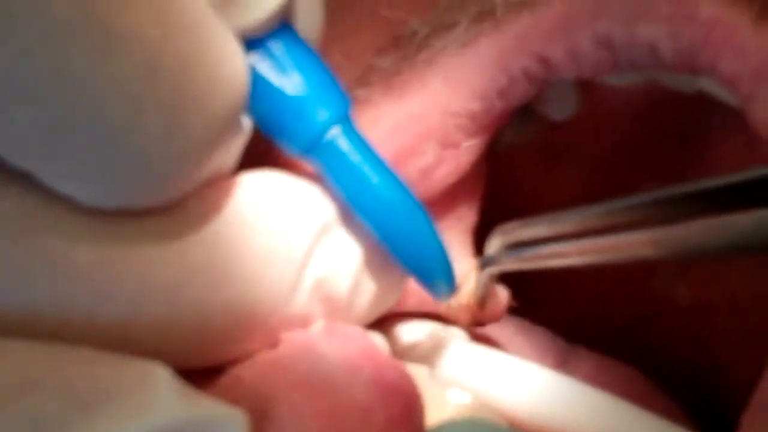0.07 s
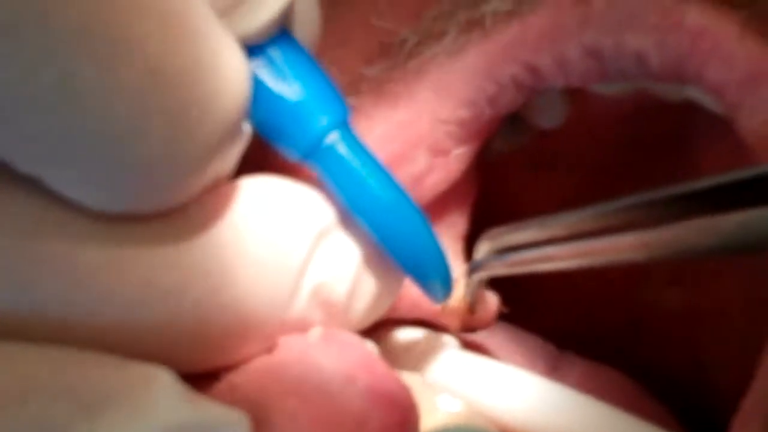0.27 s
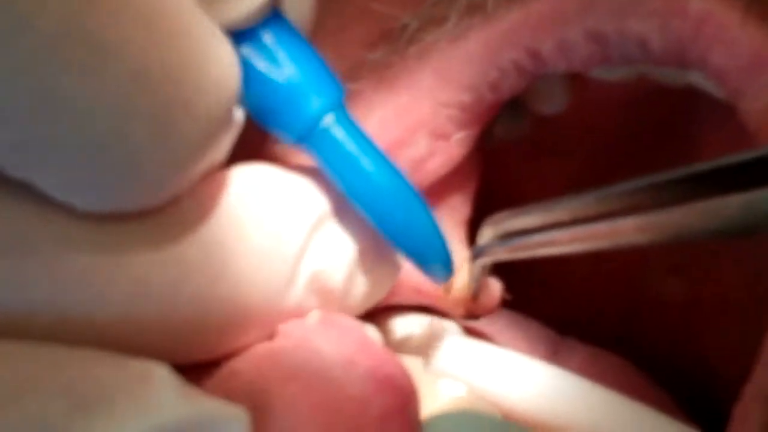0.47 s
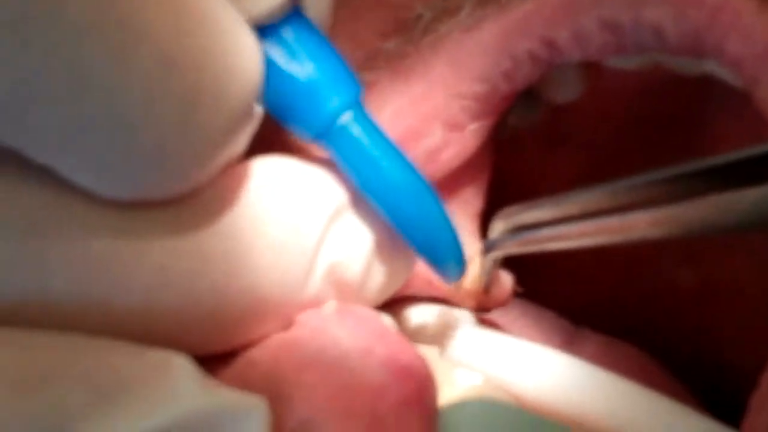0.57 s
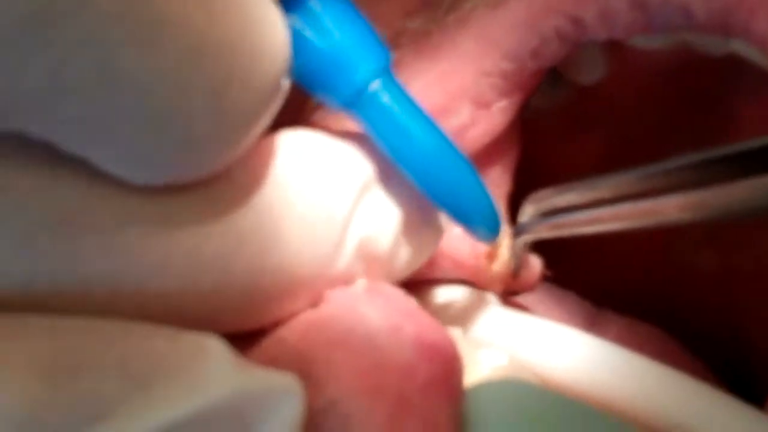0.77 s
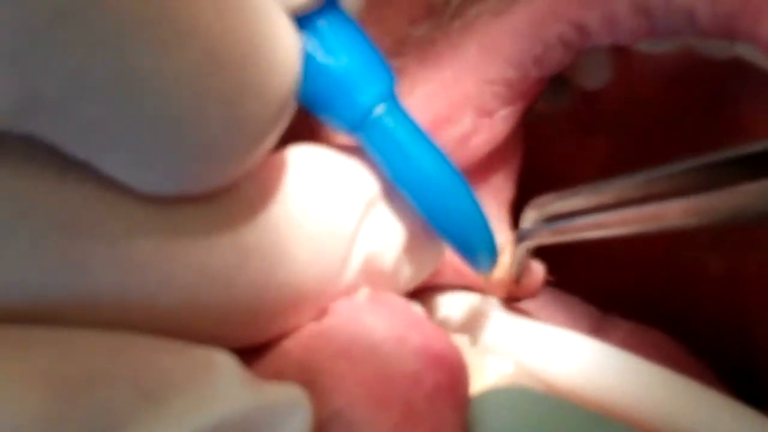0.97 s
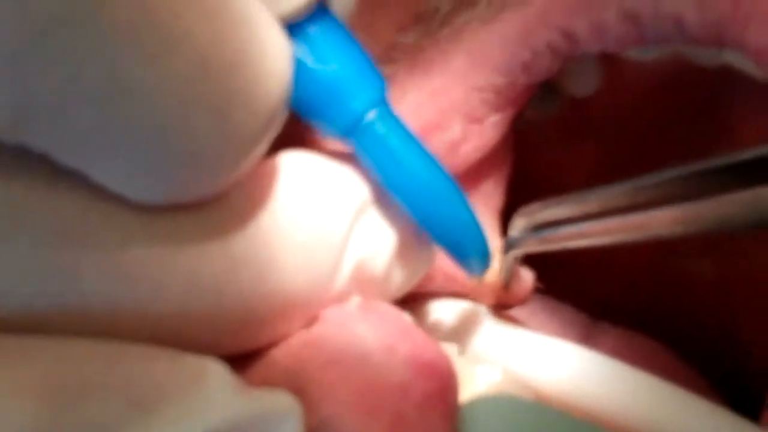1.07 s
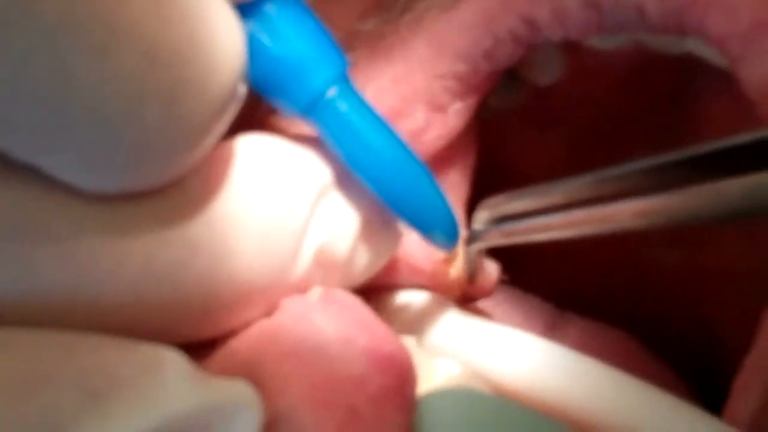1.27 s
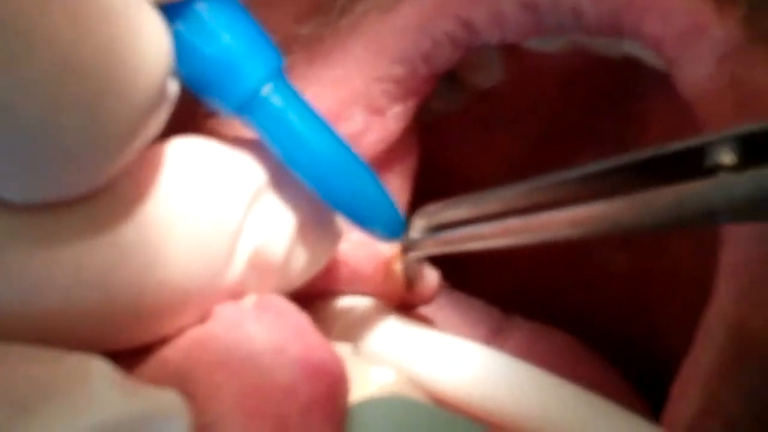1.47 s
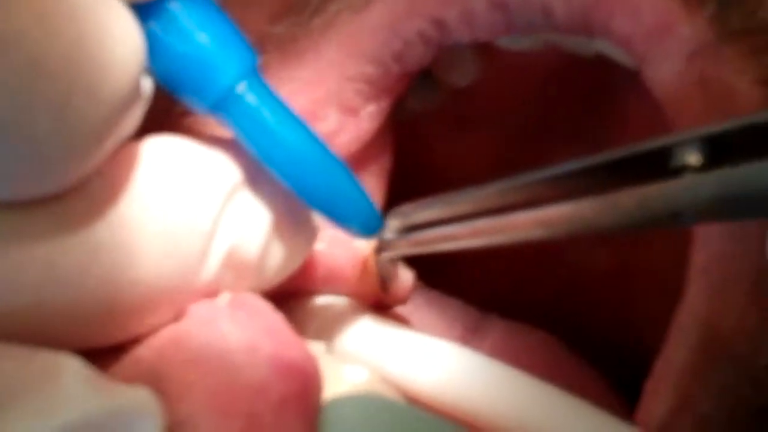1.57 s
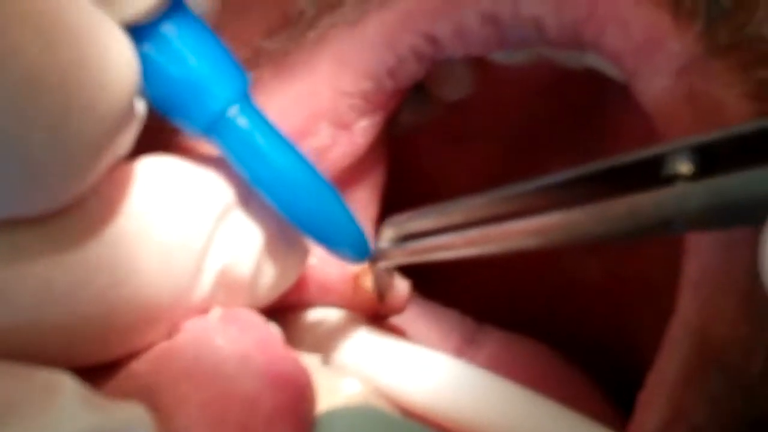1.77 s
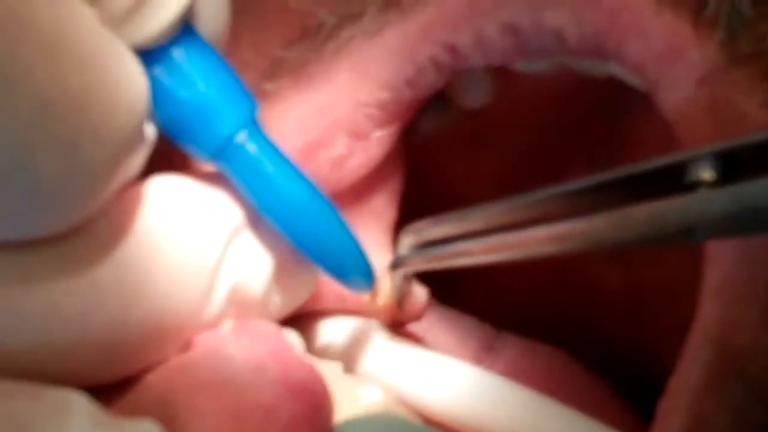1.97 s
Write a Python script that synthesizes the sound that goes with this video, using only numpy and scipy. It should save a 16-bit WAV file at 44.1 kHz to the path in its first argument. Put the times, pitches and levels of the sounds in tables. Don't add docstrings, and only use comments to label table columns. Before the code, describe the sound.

Steady airy hiss of a dental suction tube, with very faint low hum behind

```python
import sys
import numpy as np
from scipy import signal
from scipy.fft import rfft, irfft
from scipy.io import wavfile

SR = 44100
rng = np.random.default_rng(int(sys.argv[2]) if len(sys.argv) > 2 else 0)


def generate_wav(signal):
    frames = np.transpose(np.atleast_2d(signal))
    scaled = np.clip(frames, -1, 1) * 32767
    pcm = np.round(scaled).astype(np.int16)
    wavfile.write(sys.argv[1], SR, pcm)


def voltage_ratio(level):
    return 10 ** (np.asarray(level, float) / 20)


N = 89126

# time in seconds, level in dB.
AIR_FLOW = [(0, -21.6), (.15, -21), (.24, -22), (.3, -21), (.5, -20.5), (.8, -21), (1.1, -21), (1.3, -21),
            (1.5, -21.5), (1.65, -21), (1.85, -21), (2.02, -21.5)]
# centre in Hz, width in Hz, level in dB, left over right in dB, likeness 0-1.
TUBE_RESONANCES = [(963, 164, -27.5, -3.8, 0.95), (1138, 338, -16, -0.6, 0.98),
                   (1370, 350, -27.5, -1.5, .999), (3257, 466, -11, 2, 1), (3626, 357, -6, 2, 0.99),
                   (4022, 520, -13, -1.5, 1), (4855, 1100, -20.5, 3, 1), (5316, 550, -10, -0.5, 0.93),
                   (5553, 390, -7, -4.5, 1), (6007, 496, -5.5, 0.5, 1), (6300, 470, -7, -1.5, 0.89)]
# centre in Hz, width in Hz, level in dB, left over right in dB, likeness 0-1.
MOUTH_CAVITIES = [(6880, 740, -30, -10, 0.1), (7720, 210, -22.5, 6, 0.93), (8315, 185, -27.5, -5, 0.7),
                  (8970, 220, -28, 0, 1), (9180, 330, -24, -4, 1), (9710, 540, -19.5, -8.5, 1),
                  (10080, 610, -19.5, -8, 1), (10570, 510, -26, -14, 0.9), (11400, 600, -32, 6, 0),
                  (12040, 500, -24, -6, .88), (12780, 300, -36, 1.6, .4), (13420, 450, -32.5, 4, .45),
                  (14000, 240, -39.5, 1, .5), (14070, 220, -35, 6, 0.5)]
# time in seconds, level in dB.
LIP_OPENING = [
    (0, -.3),
    (.5, .4),
    (1.2, .3),
    (1.38, .2),
    (1.44, -1.2),
    (2.02, -1.2),
]
# frequency in Hz, lag in radians.
RIGHT_PORT_LAG = [(9400, 0), (10500, 1.1), (12000, 1.24), (13300, 1.5)]
# frequency in Hz, density in dB per Hz.
JET_SPECTRUM = [(600, -14.5), (1000, -40.5), (1700, 2), (2500, 4), (4000, -2.5), (7300, -3.5), (9000, -2.5),
                (14000, -17.5)]
# centre in Hz, width in Hz, depth in dB.
PATH_NULLS = [(4270, 270, -22), (6620, 300, -8), (1690, 260, -5), (10900, 300, -8), (8500, 130, -7),
              (13730, 130, -4), (13000, 130, -4), (12540, 200, -5), (7460, 110, -3), (9390, 150, -5),
              (8040, 120, -2.5)]
# time in seconds, centre in Hz, level in dB.
LIP_GAP = [(0, 3127, -24.5), (.08, 3130, -29), (.16, 2920, -32.5), (.26, 2893, -38), (.35, 2870, -36.5),
           (.42, 3123, -30), (.5, 3198, -25.5), (.56, 3390, -28.5), (.6, 3070, -31), (.76, 3030, -30),
           (.82, 2865, -35.5), (.93, 2840, -34), (.98, 3100, -32), (1.08, 3150, -36.5), (1.45, 3072, -43.5),
           (1.7, 3048, -41), (2.02, 3080, -39.5)]
# time in seconds, level in dB.
PUMP_SWELLS = [(0.0, -42.5), (0.06, -90.5), (0.21, -51), (0.25, -64), (0.38, -57), (0.4, -52), (0.9, -71),
               (0.95, -56.5), (1.1, -74), (1.15, -59.5), (1.45, -94), (1.48, -57), (1.64, -75), (1.9, -60),
               (1.96, -87), (2.02, -50)]
# frequency in Hz, density in dB per Hz.
ROOM_SPECTRUM = [(12, -33), (20, 11), (97, -2.5), (192, 9), (213, 9), (272, -8.5), (448, 7), (674, 1.5),
                 (750, -24.5), (980, -21), (1650, -120)]

FLUTTER_DB, FLUTTER_PER_S = 0.5, 25
GUST_DB, GUST_PER_S = 0.25, 10


def rms_one(x):
    return x / np.sqrt(np.mean(x ** 2) + 1e-20)


def in_time(rows):
    seconds, *columns = np.transpose(rows)
    return [np.interp(np.arange(N) / SR, seconds, column) for column in columns]


def drift(rate):
    r = np.exp(-80 * np.pi * rate / SR)
    noise = rng.standard_normal(N // 40 + 2002)
    slow = signal.lfilter([1], [1, -2 * r, r * r], noise)[2000:]
    return np.interp(np.arange(N) / 40, np.arange(len(slow)), rms_one(slow))


def stereo(mid, side, alike, pan_db):
    alike = np.clip(alike, 0, 1)
    opposed = side * np.array([[1], [-1]])
    pair = np.sqrt(1 + alike) * mid + np.sqrt(1 - alike) * opposed
    pan = voltage_ratio(np.array([[0.5], [-0.5]]) * pan_db)
    return pair * pan / np.sqrt(2)


def resonance(hz, width):
    r = np.exp(-np.pi * width / SR)
    b = (1 - r * r) / 2 * np.array([1, 0, -1])
    a = np.array([1, -2 * r * np.cos(2 * np.pi * hz / SR), r * r])
    return b, a


def coloured(points):
    hz = np.maximum(np.arange(N // 2 + 1) * SR / N, 1)
    ends = [(5, -40)] + list(points) + [(points[-1][0] * 2, -60)]
    at, db = np.transpose(ends)
    shape = voltage_ratio(np.interp(np.log(hz), np.log(at), db))
    return rms_one(irfft(rfft(rng.standard_normal((2, N))) * shape, N))


def suction():
    flow_db, = in_time(AIR_FLOW)
    gust = GUST_DB * drift(GUST_PER_S)
    out = voltage_ratio(flow_db) * (cavities(TUBE_RESONANCES, gust) + mouth(gust) + jet())
    for hz, width, depth_db in PATH_NULLS:
        band = signal.lfilter(*resonance(hz, width), out)
        out = out - (1 - voltage_ratio(depth_db)) * band
    return out


def cavities(table, gust):
    out = 0
    for hz, width, db, pan_db, alike in table:
        b, a = resonance(hz, width)
        once = signal.lfilter(b, a, rng.standard_normal((2, N)))
        mid, side = rms_one(signal.lfilter(b, a, once))
        flutter = FLUTTER_DB * drift(FLUTTER_PER_S)
        out = out + voltage_ratio(db + gust + flutter) * stereo(mid, side, alike, pan_db)
    return out


def mouth(gust):
    open_db, = in_time(LIP_OPENING)
    left, right = cavities(MOUTH_CAVITIES, gust)
    hz, lag = np.transpose(RIGHT_PORT_LAG)
    phase = np.interp(np.arange(N // 2 + 1) * SR / N, hz, lag)
    right = irfft(rfft(right) * np.exp(-1j * phase), N)
    both = np.array([left, right])
    top = signal.sosfiltfilt(signal.butter(4, 12300, "high", fs=SR, output="sos"), both)
    tilt = voltage_ratio(3.2 * open_db) - 1
    return voltage_ratio(open_db) * (both + tilt * top)


def jet():
    mid, side = coloured(JET_SPECTRUM)
    upper = signal.butter(4, 6500, "high", fs=SR, output="sos")
    apart = signal.sosfilt(upper, side) * np.array([[0.6], [-0.6]])
    return voltage_ratio(-18) * (stereo(mid, side, alike=1, pan_db=0) + apart)


def lip_gap():
    hz, db = in_time(LIP_GAP)
    width_hz = 244
    low = signal.butter(4, width_hz / 2, fs=SR, output="sos")
    a, b = signal.sosfilt(low, rng.standard_normal((2, 2, N)))
    turn = 2 * np.pi * np.cumsum(hz) / SR
    mid, side = rms_one(a * np.cos(turn) + b * np.sin(turn))
    return voltage_ratio(db) * stereo(mid, side, alike=0.96, pan_db=0.8)


def pump():
    swell_db, = in_time(PUMP_SWELLS)
    hz = 186.3 + 2.5 * drift(6.4)
    turn = 2 * np.pi * np.cumsum(hz) / SR
    beat_db = -1.5 * drift(8.7)
    tone = np.sin(turn) + voltage_ratio(-14) * np.sin(2 * turn)
    return np.sqrt(2) * voltage_ratio(swell_db + beat_db) * tone


def room():
    mid, side = coloured(ROOM_SPECTRUM)
    both = stereo(mid, side, alike=0.4, pan_db=-0.3)
    low = signal.sosfilt(signal.butter(2, 130, fs=SR, output="sos"), both)
    rumble = low * voltage_ratio(5 * drift(7.1) + 0.5)
    air = (both - low) * voltage_ratio(2 * drift(18.0))
    return voltage_ratio(-60) * (rumble + air)


def scene():
    return suction() + lip_gap() + pump() + room()


def roll_off(x):
    return signal.sosfilt(signal.butter(12, 14220, fs=SR, output="sos"), x)


def record(dry):
    return roll_off(dry)


dry = scene()
out = record(dry)
generate_wav(out)
```